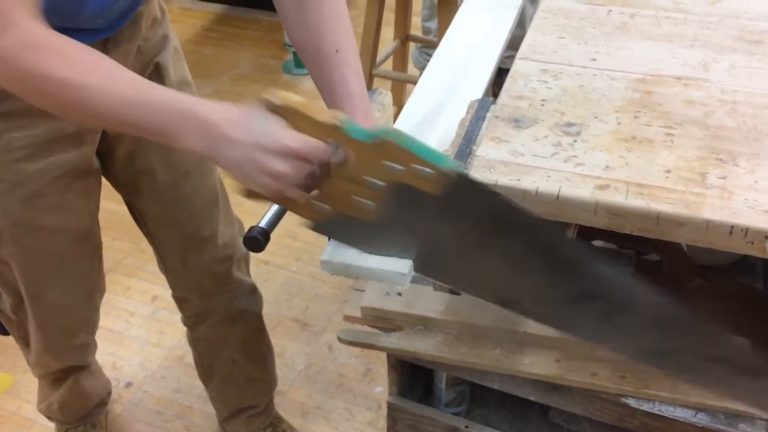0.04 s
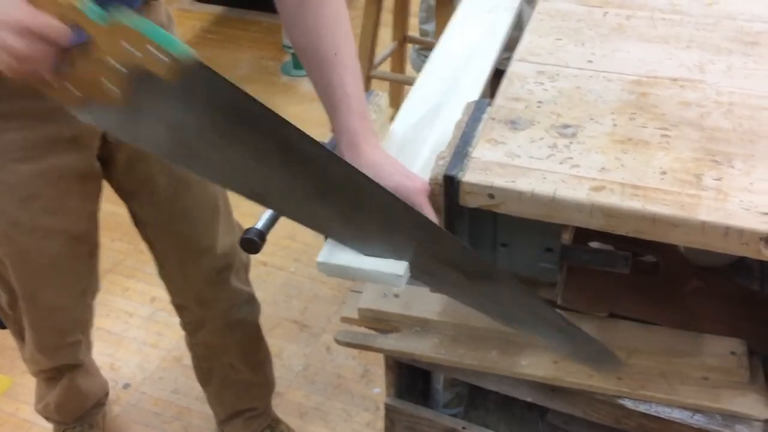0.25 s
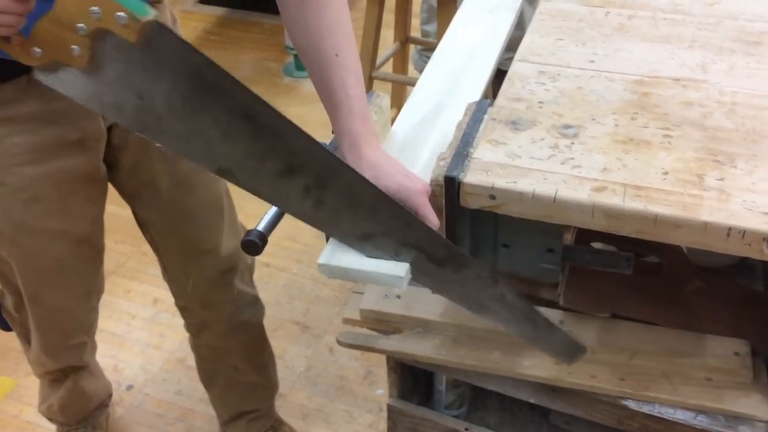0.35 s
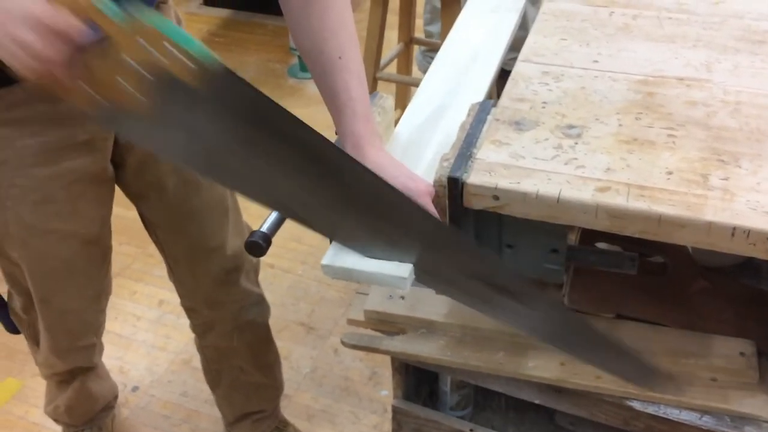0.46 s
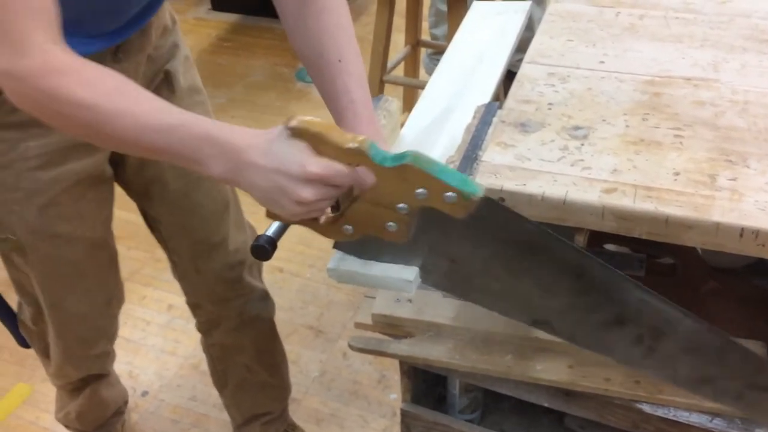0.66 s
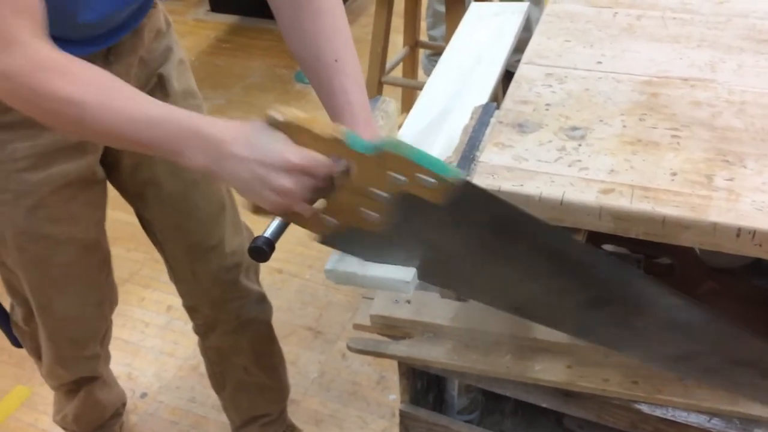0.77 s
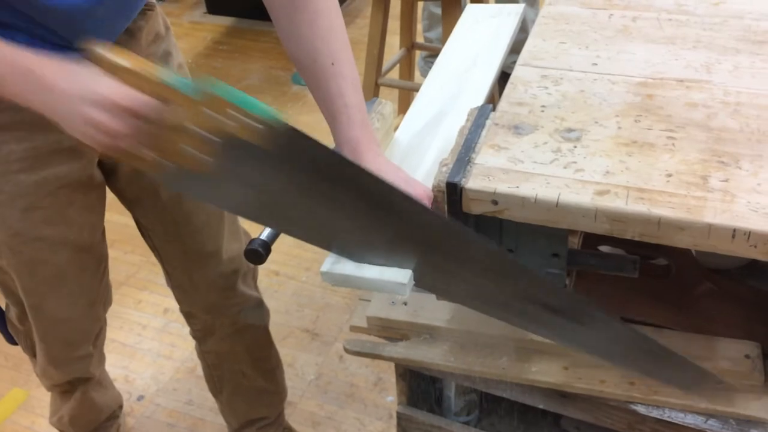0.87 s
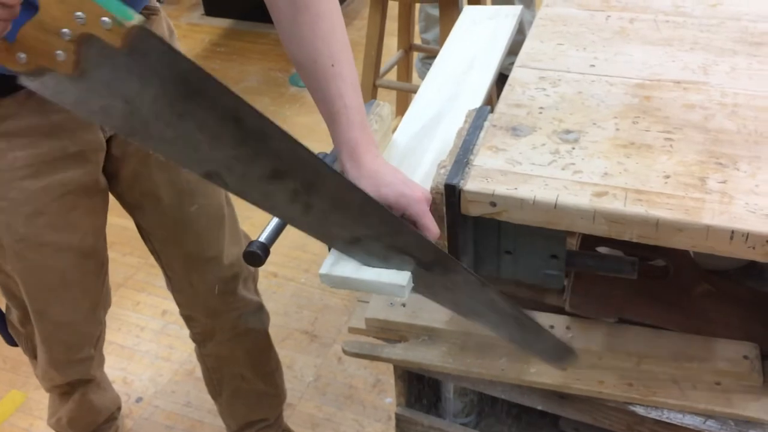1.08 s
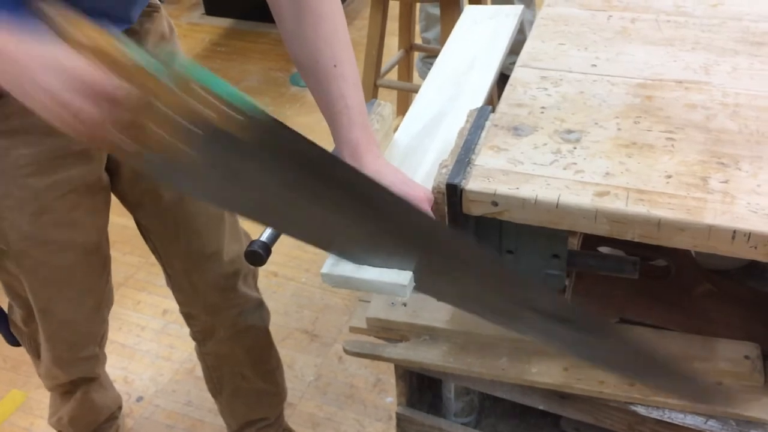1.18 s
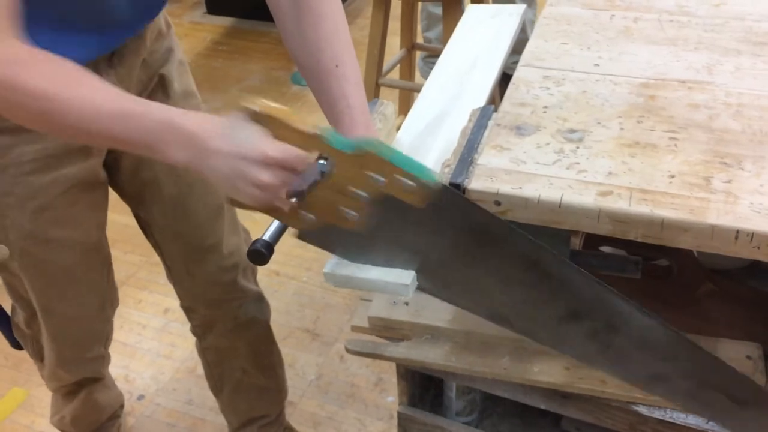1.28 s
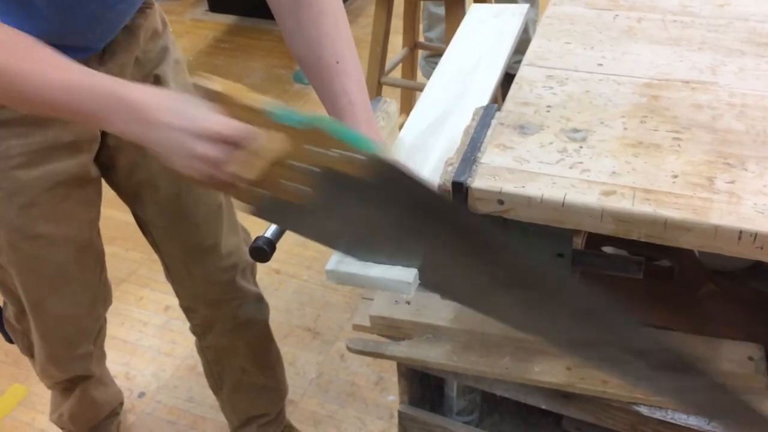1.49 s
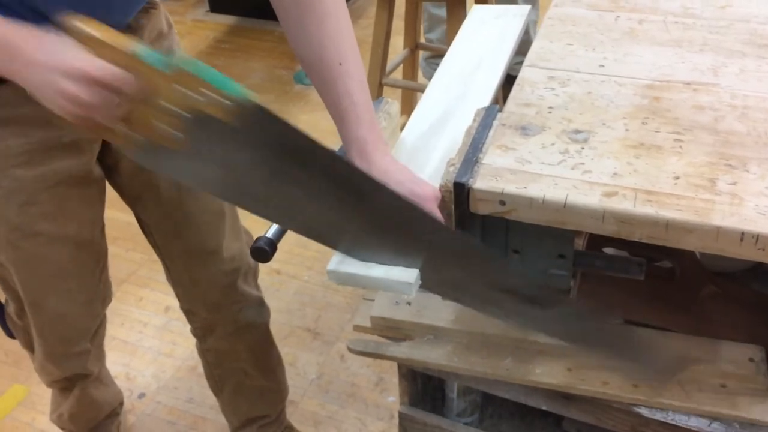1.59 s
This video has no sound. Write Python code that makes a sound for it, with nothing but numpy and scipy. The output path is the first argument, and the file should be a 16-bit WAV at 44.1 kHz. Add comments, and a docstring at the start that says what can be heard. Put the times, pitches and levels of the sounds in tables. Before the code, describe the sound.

A hand saw rasps through a wooden board, close by in a small workshop. A light pull comes around 0.3 seconds, with brief metallic whines. A heavier push follows, peaking in a loud, short falling squawk at 0.6 seconds. The pull repeats near 1 second, the next push squawks at 1.3, and a third pull starts around 1.5. The bench rumbles faintly under the strokes.

```python
"""A hand saw cuts a board clamped to a bench in a small workshop; the stroke is already under way.
A light pull comes first: the teeth tear fibres and set the steel blade ringing, with brief whines.
A heavier push follows; at its height, near 0.6 s, the blade chatters in a short falling squawk
and a limiter ducks everything. Pull and push repeat, squawking near 1.3 s, and a third pull begins.
Throughout, the bench rumbles under the strokes, over faint room tone."""
import sys
import numpy as np
from scipy import signal
from scipy.fft import rfft, irfft, next_fast_len
from scipy.io import wavfile
from scipy.ndimage import uniform_filter1d

SR = 44100
rng = np.random.default_rng(int(sys.argv[2]) if len(sys.argv) > 2 else 0)


def generate_wav(signal):
    """Clip the signal to [-1, 1] and save it as 16-bit WAV at the path in sys.argv[1]."""
    frames = np.transpose(np.atleast_2d(signal))
    scaled = np.clip(frames, -1, 1) * 32767
    pcm = np.round(scaled).astype(np.int16)
    wavfile.write(sys.argv[1], SR, pcm)


N = 72765
LEAD = SR // 3
T = np.arange(-LEAD, N) / SR   # seconds, with a run-up before 0
CYCLE_S = .705   # one pull and push
GRAIN_HZ = 88   # bandwidth of the flutter from hard and soft wood
PULL_COLUMN, PUSH_COLUMN = 1, 2   # of the blade's modes


def pulls():
    """Light strokes: the teeth are drawn back through the wood."""
    # Tooth force, one curve per pull. Each point: time in seconds, relative level in dB.
    force_db = [
        [(.08, -52), (.17, -36), (.216, -33), (.255, -26.5), (.31, -27.5), (.38, -36.5), (.415, -64)],
        [(.80, -51), (.868, -39.5), (.91, -36), (.954, -29), (1.028, -29), (1.09, -36), (1.135, -64)],
        [(1.48, -57), (1.50, -48), (1.548, -46.5), (1.578, -36.5), (1.61, -39.5), (1.636, -31.5), (1.68, -40.5)],
    ]
    # Spectrum of tearing fibres. Each row: frequency in Hz, relative density in dB.
    spectrum = [(100, -8.5), (330, -8), (480, -9), (700, 3), (1500, 4), (2500, -1), (3500, -1), (6000, -2),
                (10000, -7.5), (15000, -12.5)]
    return rasp(level(force_db), spectrum, PULL_COLUMN, rasp_db=7.5, ring_db=-3.5, hum_db=-5.5)


def pushes():
    """Heavy strokes: the teeth are driven forward into the wood."""
    # Tooth force, one curve per push. Each point: time in seconds, relative level in dB.
    force_db = [
        [(.41, -69), (.427, -47.5), (.465, -43.5), (.515, -31), (.565, -26), (.61, -25), (.65, -29.5),
         (.69, -48), (.745, -74)],
        [(1.14, -50), (1.17, -48), (1.186, -33.5), (1.244, -25), (1.29, -24.5), (1.335, -27), (1.365, -40),
         (1.395, -75), (1.43, -74)],
    ]
    # Spectrum of tearing fibres. Each row: frequency in Hz, relative density in dB.
    spectrum = [(100, -16.5), (330, -17), (480, 0.5), (700, 8), (1500, 1), (2500, 0.5), (3500, -1),
                (6000, -2.5), (10000, -8.5), (15000, -12)]
    return rasp(push_level(force_db), spectrum, PUSH_COLUMN, rasp_db=10.5, ring_db=1, hum_db=-21)


def rasp(force, spectrum, column, rasp_db, ring_db, hum_db):
    """Fibres snap at random, a little more densely as each tooth passes, heard directly and through the blade;
    passing teeth hum."""
    snaps_per_s, snap_spread_db, snap_share = 6000, 2, .56
    grain_db, tooth_depth = .9, .18
    phase = tooth_phase(jitter=.0608)
    sizes = amp(snap_spread_db * np.minimum(rng.exponential(1, len(T)), 4)) * np.sign(noise())
    snaps = unit(sizes * (rng.random(len(T)) < snaps_per_s / SR))
    bite = force * unit(amp(grain_db * drift(GRAIN_HZ)))
    fibres = np.sqrt(snap_share) * snaps + np.sqrt(1 - snap_share) * noise()
    tearing = bite * unit(fibres * (1 + tooth_depth * np.cos(phase)))
    direct = amp(rasp_db) * moving_blade(colour(tearing, spectrum))
    ring = amp(ring_db) * blade(tearing, column)
    hum = amp(hum_db) * bite * np.sin(phase)
    return direct + ring + hum


def squawk():
    """The blade locks to the teeth and chatters, sinking in pitch and losing grip as the push slows."""
    # Chatter, one curve per push. Each point: time in seconds, fundamental in dB, octave in dB.
    chatter_db = [
        [(.55, -39, -34), (.568, -20, -47), (.577, -8.5, -47), (.588, -2, -16.5), (.602, 0.5, -3),
         (.611, -7.5, -3.5), (.621, -18.5, -20), (.636, -2, -10.5), (.644, -22.5, -20), (.66, -47, -40)],
        [(1.25, -23, -40), (1.275, -26, -43), (1.283, -8.5, -57), (1.294, 0, -6), (1.306, -2, -4.5),
         (1.315, -2, -3), (1.324, -21.5, -21), (1.338, -4.5, -21.5), (1.348, -29, -21), (1.365, -27.5, -40)],
    ]
    # Partials 3 to 5, each in dB against the fundamental.
    overtones_db = [-14, -21.5, -30.5]
    lock_hz, slip_per_hz = 640, .0004
    slip = slip_per_hz * np.maximum(lock_hz - tooth_rate_hz(), 0)
    phase = tooth_phase(jitter=.00718 + slip)
    fundamental, octave = push_level(chatter_db), push_level(chatter_db, column=2)
    gains = [fundamental, octave] + [fundamental * amp(db) for db in overtones_db]
    return np.sqrt(2) * sum(gain * np.sin(k * phase) for k, gain in enumerate(gains, 1))


def whines():
    """The saw catches in the kerf: single notes swell under friction, then ring out."""
    # Each row: peak time in seconds, pitch in Hz, level in dB, swell in seconds.
    notes = [(.258, 1340, -25.5, 0.015), (.31, 1335, -20.5, 0.0069), (.315, 2112, -27.5, 0.014),
             (.365, 1345, -28, 0.013), (.428, 700, -36.5, 0.033), (.495, 268, -32, 0.023),
             (0.544, 2112, -22, 0.02), (.565, 1880, -23, 0.019), (0.609, 1916, -15.5, 0.028),
             (0.891, 1342, -33, 0.017), (0.988, 1918, -28.5, 0.038), (1.034, 1335, -24.5, 0.0074),
             (1.079, 2108, -28.5, .012), (1.276, 2112, -16.5, 0.018), (1.333, 1340, -16, 0.017),
             (1.645, 665, -30, 0.014)]
    t60_s, rough_db, waver = .065, 3.5, .01206
    out = 0
    for peak_s, hz, db, swell_s in notes:
        swell = np.exp(-((T - peak_s) / swell_s) ** 2)
        ring_out = amp(-60 * np.maximum(T - peak_s, 0) / t60_s) * (T > peak_s)
        phase = 2 * np.pi * hz * np.cumsum(1 + waver * drift(GRAIN_HZ)) / SR
        gain = np.sqrt(2) * amp(db + rough_db * drift(GRAIN_HZ))
        out = out + gain * np.maximum(swell, ring_out) * np.sin(phase)
    return out


def blade(force, column):
    """Modes of blade and board ring in parallel."""
    # Each row: frequency in Hz, rms gain for white force in dB on the pull, on the push, T60 in seconds.
    modes = [(422.4, -14, -7.5, 0.65), (548.5, -39, -17.5, 0.38), (625, -13.5, -10, 0.62),
             (688.5, -13.5, -6.5, 0.18), (773, -12.5, -9, 0.17), (881, -14, -18, 0.16),
             (1001, -5, -23, 0.31), (1330, -6.5, -8.5, 0.3), (1372, -3.5, -2.5, 0.097),
             (1516, -8.5, -13, 0.16), (1858, -2, -3.5, 0.04), (1899, -9, -10, 0.098),
             (2107, -5.5, -13, 0.1), (2520, -27, -20, 0.5), (2782, -24, -15, 0.2), (3430, -19, -17.5, 0.13),
             (3602, -16, -16.5, 0.05), (4420, -49, -18, 0.1)]
    out = 0
    for mode in modes:
        hz, t60_s = mode[0], mode[-1]
        radius, angle = amp(-60 / (t60_s * SR)), 2 * np.pi * hz / SR
        ring = signal.lfilter([1, 0, -1], [1, -2 * radius * np.cos(angle), radius ** 2], force)
        out = out + amp(mode[column]) * np.sqrt((1 - radius ** 2) / 2) * ring
    return out


def moving_blade(x):
    """The rasp dulls when the saw is slow; a short reflection off the blade sweeps with the stroke."""
    treble_hz, bright_rate_hz = 1500, 484
    echo_s, swing_s, turn_s, echo_gain = .0016, .00052, .41, .33
    treble = signal.sosfilt(signal.butter(1, treble_hz, "high", fs=SR, output="sos"), x)
    dulling = .2 * np.maximum(1 - tooth_rate_hz() / bright_rate_hz, 0)
    x = x - dulling * treble
    delay_s = echo_s + swing_s * np.cos(2 * np.pi * (T - turn_s) / CYCLE_S)
    return (x + echo_gain * np.interp(T - delay_s, T, x)) / np.hypot(1, echo_gain)


def tooth_rate_hz():
    """Saw speed, as teeth passing the cut per second."""
    # Each row: time in seconds, tooth rate in Hz.
    speed = [(.08, 99.7), (.17, 700), (0.251, 987.8), (.33, 740), (.41, 70.72), (.50, 269.5), (.56, 590),
             (0.591, 673.5), (0.609, 641), (.628, 541.6), (.64, 550.5), (.70, 380), (.79, 80.2),
             (0.879, 649.5), (.96, 952), (1.06, 770.7), (1.134, 69.55), (1.19, 216.8), (1.25, 611.2),
             (1.284, 692), (1.303, 683.4), (1.32, 602.6), (1.336, 554.6), (1.35, 494), (1.40, 380),
             (1.48, 80.76), (1.65, 858)]
    times_s, hz = np.transpose(speed)
    return np.interp(np.where(T < 0, T + CYCLE_S, T), times_s, hz)


def tooth_phase(jitter):
    """One turn per passing tooth; jitter is the relative spread of the speed."""
    return 2 * np.pi * np.cumsum(tooth_rate_hz() * (1 + jitter * drift(GRAIN_HZ))) / SR


def bench():
    """The bench shudders under the strokes."""
    # Rumble envelope. Each row: time in seconds, relative level in dB.
    envelope = [(0, -50.5), (.22, -49.5), (.262, -44), (.305, -50), (.338, -39), (.40, -48), (.53, -42),
                (.575, -45), (.63, -55), (.80, -57), (.96, -54), (1.025, -38.5), (1.065, -43.5),
                (1.105, -40.5), (1.159, -44), (1.285, -39), (1.36, -56), (1.65, -54)]
    # Rumble spectrum. Each row: frequency in Hz, relative density in dB.
    spectrum = [(20, -32), (45, -36), (65, -1.5), (85, -2.5), (110, -5), (170, -6), (280, -10.5),
                (500, -20), (2000, -66)]
    times_s, db = np.transpose(envelope)
    return amp(1 + np.interp(T, times_s, db)) * unit(colour(noise(), spectrum))


def workshop(x):
    """Dense wall reflections whose treble dies first."""
    gap_s, wall_hz, low_t60_s, treble_t60_s = .005, 3240, .36, .21
    t = np.arange(SR // 2) / SR
    white = rng.standard_normal(len(t)) * (t > gap_s)
    low = signal.sosfilt(signal.butter(1, wall_hz, fs=SR, output="sos"), white)
    tail = low * amp(-60 * t / low_t60_s) + .5 * (white - low) * amp(-60 * t / treble_t60_s)
    return signal.fftconvolve(x, tail / np.sqrt(np.sum(tail ** 2)))[:len(x)]


def room_tone():
    """Faint steady noise of the air."""
    # Each row: frequency in Hz, relative density in dB.
    spectrum = [(20, -43), (80, -14.5), (200, -4), (500, -8.5), (2000, -8), (6000, -30.5), (15000, -37)]
    return amp(-48) * unit(colour(noise(), spectrum))


def level(curves, column=1, ahead_s=0):
    """Summed gain along dB curves, silent outside them."""
    return sum(amp(np.interp(T + ahead_s, curve[:, 0], curve[:, column], left=-np.inf, right=-np.inf))
               for curve in map(np.array, curves))


def push_level(curves, column=1):
    """Gain of the pushes, plus one a cycle earlier that is dying away at the start."""
    return level(curves, column) + level(curves[:1], column, ahead_s=CYCLE_S)


def colour(x, points):
    """Shape by a spectrum of (Hz, dB) points."""
    hz, db = np.transpose(points)
    size = next_fast_len(len(x))
    bins_hz = np.maximum(np.fft.rfftfreq(size, 1 / SR), 1)
    gain = amp(np.interp(np.log(bins_hz), np.log(hz), db))
    return irfft(rfft(x, size) * gain, size)[:len(x)]


def drift(hz):
    """Smooth random motion, rms 1."""
    pole = np.exp(-2 * np.pi * hz / SR)
    return unit(signal.lfilter([1], [1, -2 * pole, pole * pole], noise()))


def noise():
    """White noise."""
    return rng.standard_normal(len(T))


def amp(db):
    """Decibels to gain."""
    return 10 ** (np.asarray(db) / 20)


def unit(x):
    """Scale to rms 1."""
    return x / np.sqrt(np.mean(x ** 2) + 1e-20)


def scene():
    """Saw, reflections, bench and room tone, in mono."""
    cutting = pulls() + pushes() + whines()
    chatter = squawk()
    saw = cutting + chatter + amp(-32.5) * blade(chatter, PUSH_COLUMN)
    reflections = workshop(amp(-12) * cutting + amp(-20) * chatter)
    return (saw + reflections + bench() + room_tone())[None, LEAD:]


def record(dry):
    """Microphone bass roll-off, fast limiter, peak clipping, steep low-pass."""
    highpass_hz, lowpass_hz = 35, 15400
    limit_db, release_db_per_s, detect_s, attack_s = -8, 285, .00242, .0012
    x = signal.sosfilt(signal.butter(2, highpass_hz, "high", fs=SR, output="sos"), dry)
    power = uniform_filter1d(x[0] ** 2, int(detect_s * SR))
    over_db = np.maximum(10 * np.log10(np.abs(power) + 1e-12) - limit_db, 0)
    release_db = release_db_per_s * np.arange(N) / SR
    held_db = np.maximum.accumulate(over_db + release_db) - release_db
    pole = np.exp(-1 / (attack_s * SR))
    cut_db = signal.lfilter([1 - pole], [1, -pole], held_db)
    clipped = np.clip(x * amp(-cut_db), -.95, .95)
    return signal.sosfilt(signal.ellip(12, .1, 90, lowpass_hz, fs=SR, output="sos"), clipped)


dry = scene()
out = record(dry)
generate_wav(out)
```